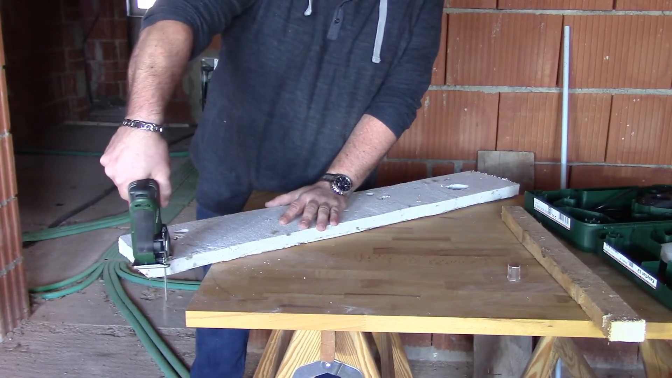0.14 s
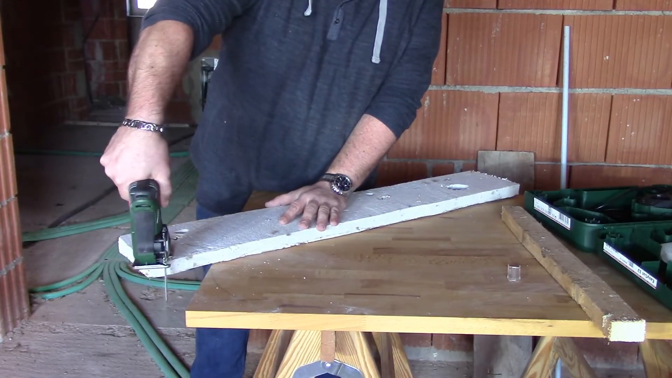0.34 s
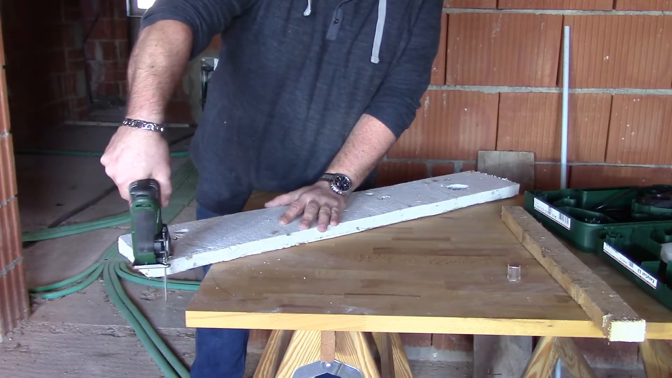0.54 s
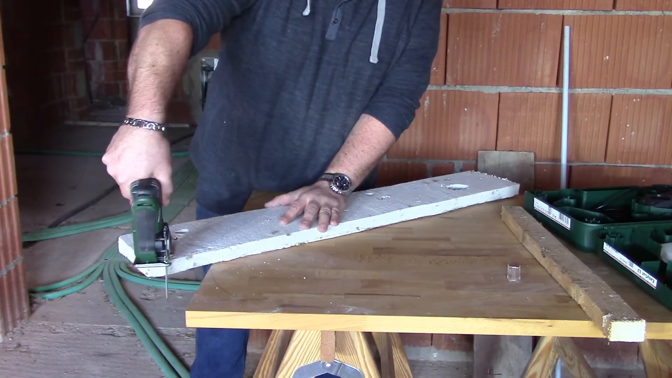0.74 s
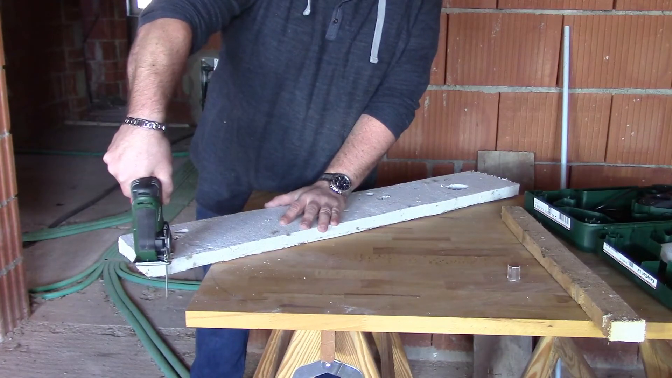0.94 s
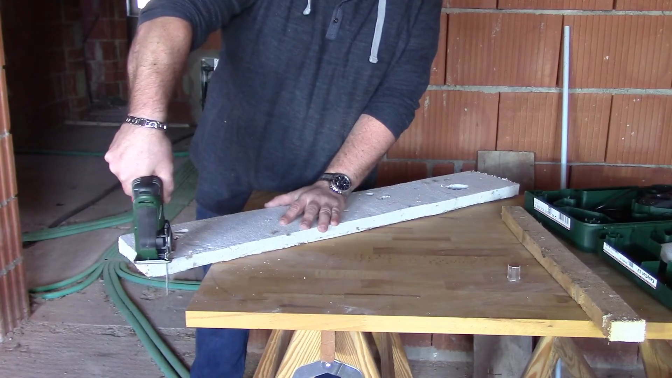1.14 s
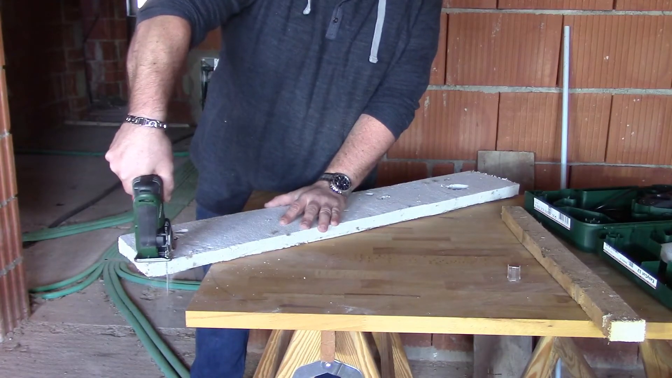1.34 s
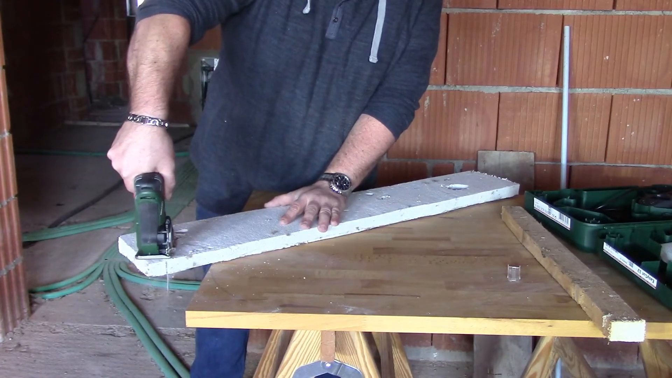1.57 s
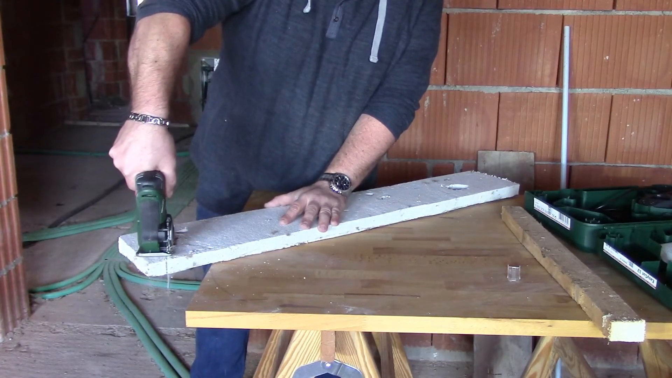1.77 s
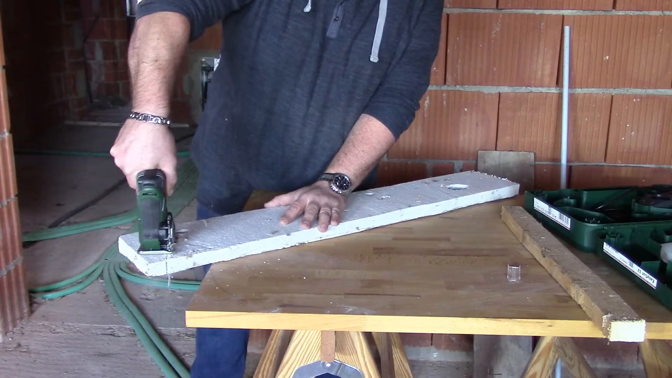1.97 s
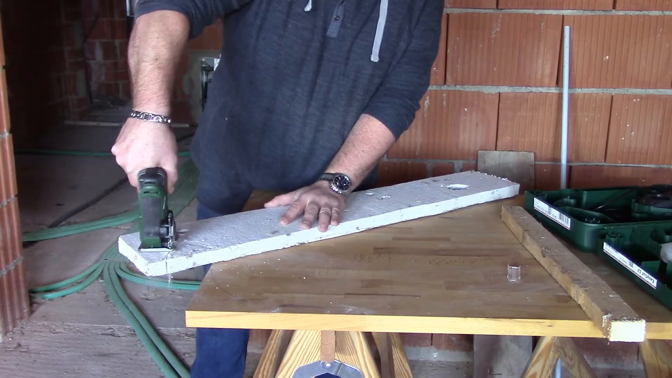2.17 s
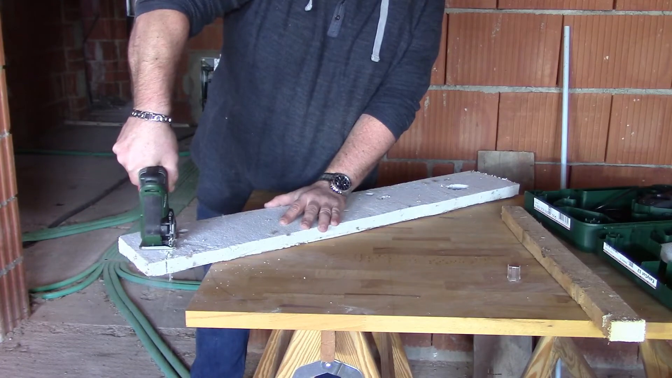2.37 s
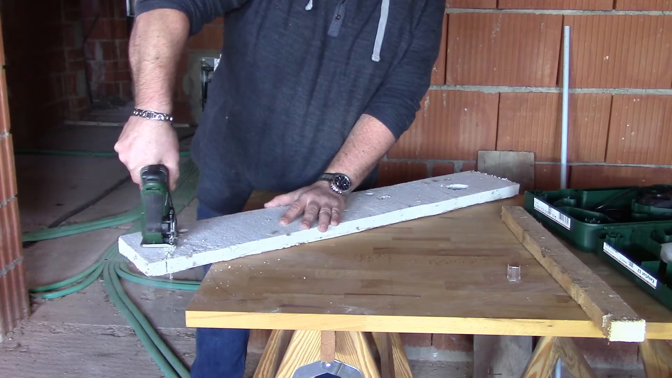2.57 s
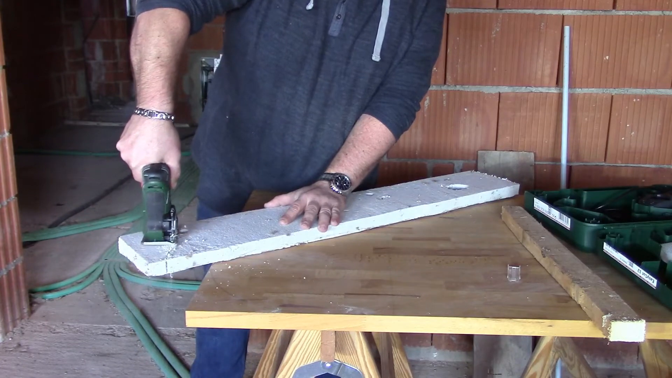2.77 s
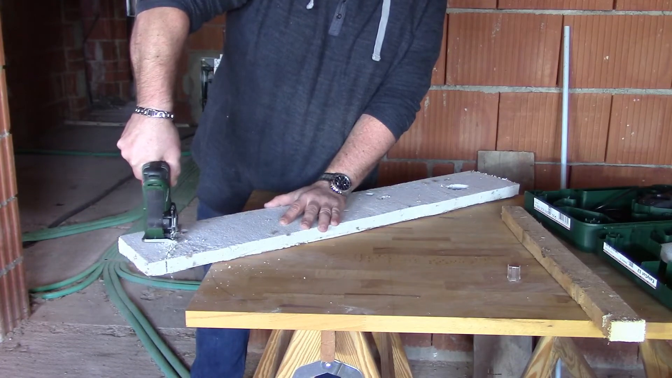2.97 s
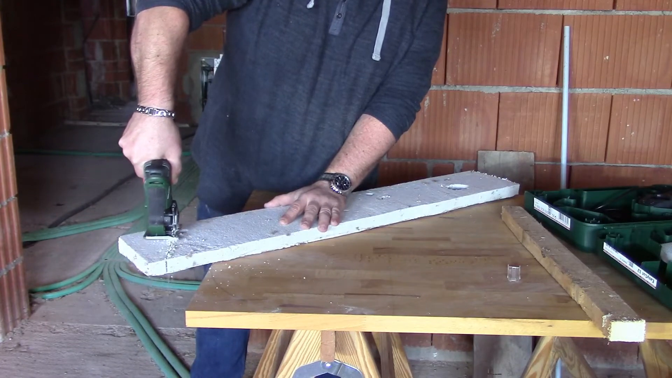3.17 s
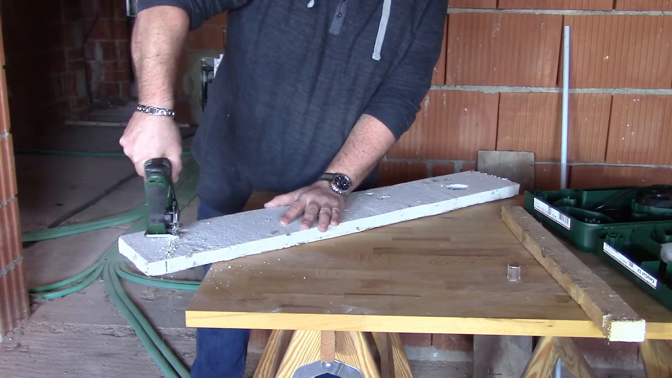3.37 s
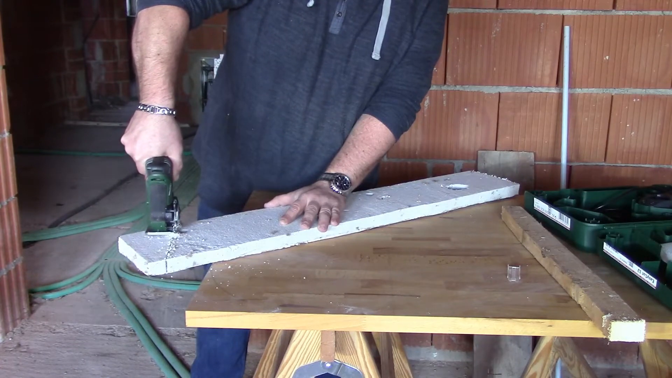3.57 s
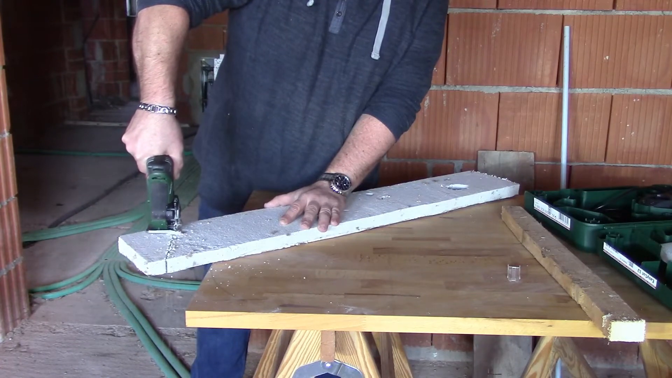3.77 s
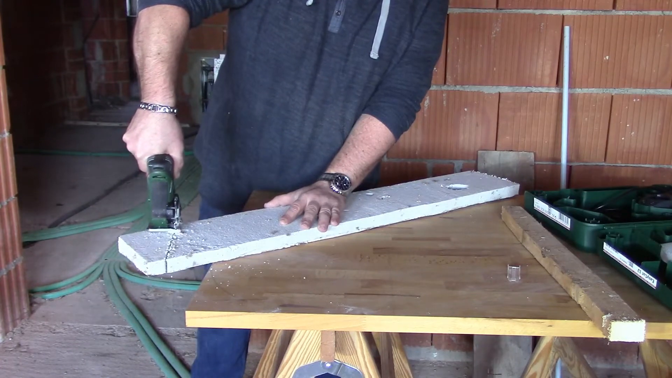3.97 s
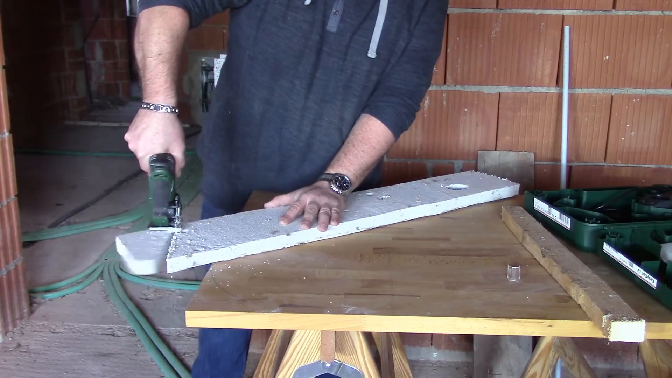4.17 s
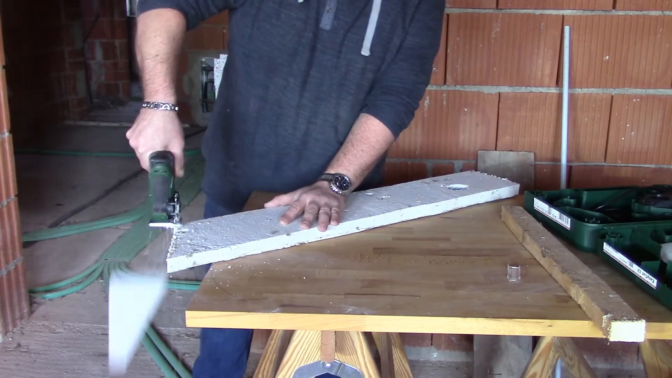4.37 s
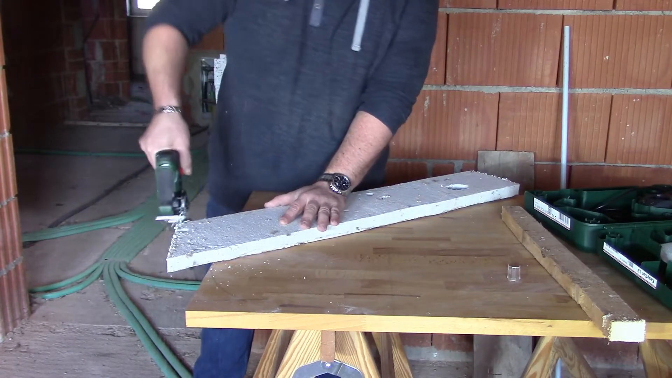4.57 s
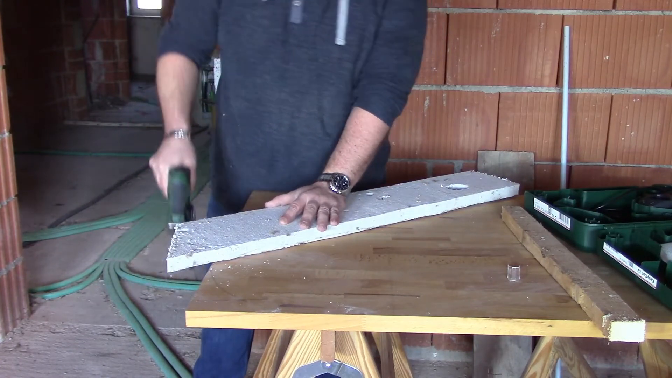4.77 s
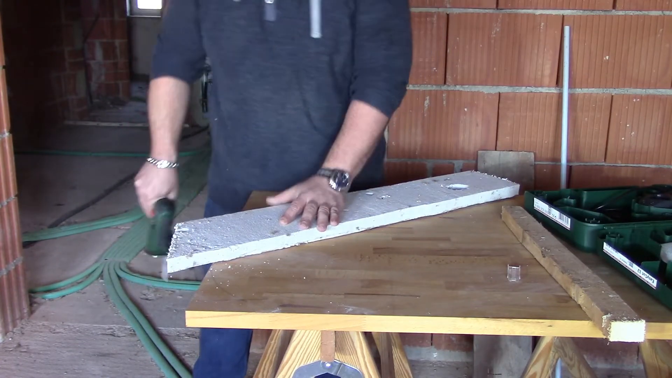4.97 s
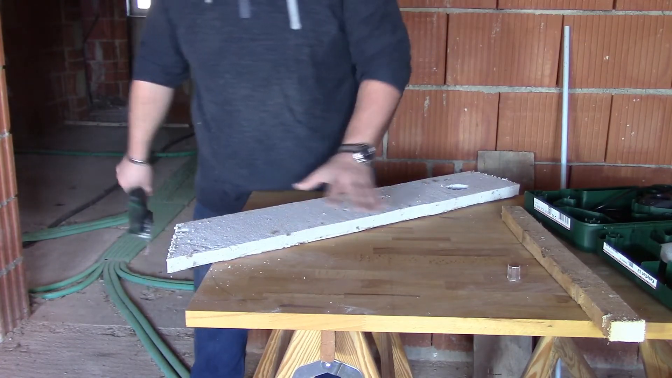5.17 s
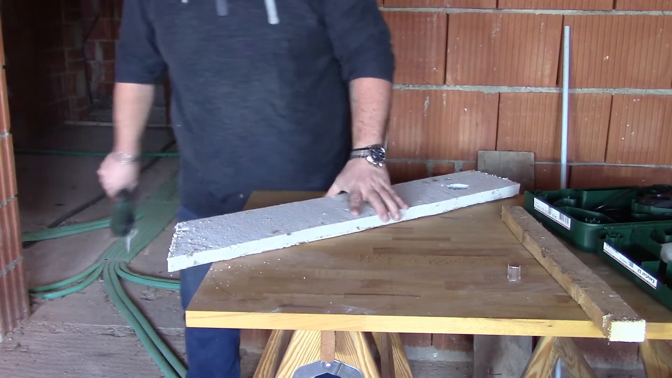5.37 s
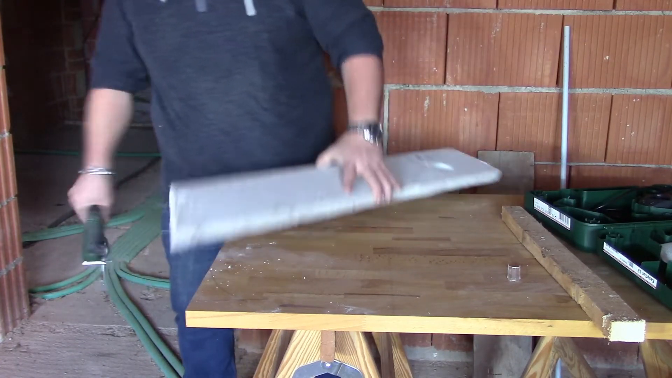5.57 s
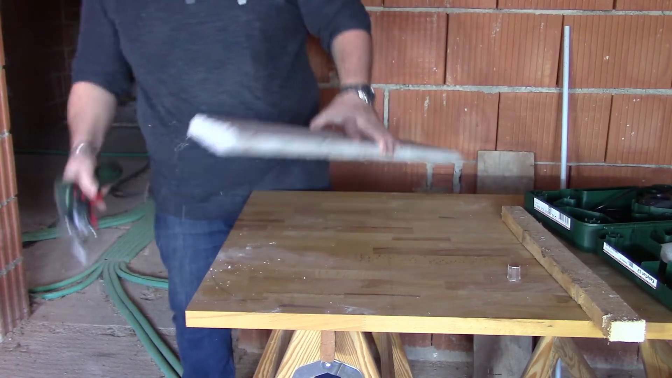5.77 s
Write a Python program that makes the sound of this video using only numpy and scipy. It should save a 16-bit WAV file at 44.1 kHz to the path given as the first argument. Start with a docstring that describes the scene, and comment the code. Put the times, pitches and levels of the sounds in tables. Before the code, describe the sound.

A small cordless saw cuts through a foam board on a workbench, its high motor whine mixed with a loud rattling rasp and a wavering howl. After about four seconds the foam snaps and the saw winds down. The offcut hits the floor with a short ringing clatter. Light scrapes, dull bumps and a few plastic clicks follow. The sound is fairly close, with a short brick room echo.

```python
"""Sawing foam board in a brick room.

A small cordless chain saw cuts through a foam board on a workbench. The motor whines at multiples of
its shaft speed, the chain rattles, and the teeth drive the bar into a howl, highest half way through.
The offcut snaps free and clatters to the floor, ringing in its own modes. The board scrapes off the
bench and the plastic tool clicks in the hand, while the brick walls reflect the sound."""
import sys
import numpy as np
from scipy import signal
from scipy.fft import rfft, irfft
from scipy.io import wavfile
from scipy.ndimage import uniform_filter1d

SR = 44100
rng = np.random.default_rng(int(sys.argv[2]) if len(sys.argv) > 2 else 0)


def dump_mix(stems):
    """Bounce the given channels to the path in sys.argv[1] as a 16-bit WAV at rate SR."""
    frames = np.atleast_2d(stems).T  # one column per channel
    limited = np.clip(frames, -1, 1)  # hard clip at full scale
    pcm = np.round(limited * 32767).astype(np.int16)
    wavfile.write(sys.argv[1], SR, pcm)


N = 256662
TIME = np.arange(N) / SR
FREQ = np.fft.rfftfreq(N, 1 / SR)
FREE_SPEED = 388.3  # turns per second of the unloaded shaft
THROUGH_S, RELEASE_S = 4.2, 0.033  # the cut is through and the chain runs free


def saw():
    """Amplitude modulation: links strike the foam in step with the shaft. Returns (rasp, tones)."""
    depth = arch(2.32, 0.91)  # the bar sinks into the board and comes out again
    grip = arch(1.8, .9)  # the kerf grips hardest a little before the middle of the cut
    speed = shaft_speed()
    turns = np.cumsum(speed) / SR
    bite = amp(2.5 * np.cos(2 * np.pi * turns) + 1.24 * wander(286.5) + 0.77 * wander(32.45))
    push_grind_db, push_drum_db, push_howl_db = hand_pressure()
    rattle = chain_rattle(bite, speed)
    cutting = tooth_grinding(bite, push_grind_db) + board_drumming(bite, push_drum_db)
    shake = bench_shake(speed, depth)
    howl = amp(push_howl_db) * bar_howl(bite, depth, grip)
    body = amp(3.0) * bench(cutting + shake, direct_db=-3) + amp(4.5) * bench(howl, direct_db=-7)
    running = np.interp(TIME, [4.335, 4.375], [1, 0])  # the brake stops the chain
    rasp = running * (rattle + body + chain_singing(grip))
    trigger = np.interp(TIME, [4.24, 4.33], [1, 0])  # the whine fades as the trigger is let go
    return rasp, trigger * motor_whine(speed, grip) + bar_chatter() + bar_ring()


def shaft_speed():
    """Torque against load: half trigger, full trigger, sag in the cut, then exponential braking."""
    # The shaft at half trigger, then from the squeeze on. Each row: time in seconds, turns per second.
    half_trigger = [(0, 275), (.185, 283)]
    full_trigger = [(.24, 337), (.29, 372), (.38, 385.3), (.62, 389.2), (.88, 387), (1.1, 382.8),
                    (2, 380.2), (2.2, 382.5), (2.98, 380.2), (3.05, 377), (3.2, 382.6), (3.32, 383.4),
                    (3.68, 379), (3.8, 383.6), (3.92, 384.2), (4.01, 377.5), (4.1, 382.2), (4.24, 384.5),
                    (4.3, 370.8)]
    brake_s, brake_decay_s = 4.32, .19
    driven = uniform_filter1d(curve(list(half_trigger) + list(full_trigger)), size=SR // 20)
    return driven * np.exp(-np.maximum(TIME - brake_s, 0) / brake_decay_s)


def motor_whine(speed, grip):
    """Rotational harmonics: shaft and gear orders flicker, and break up once the teeth bite."""
    # Motor partials. Each row: multiple of the shaft speed, level in dB, change at full grip in dB,
    # change while speeding up in dB, fade in dB per second.
    orders = [(1, -35, 2.5, -1, -.3), (2, -37, 2, 0, .5), (6, -42, 0, 0, 0), (8, -30.5, -5, 9, 0),
              (9, -37, 2, -4, .2), (10, -32, -2, -3, .8), (16, -31, 6, -1, 1.4), (17, -37.5, 8.5, -3, -.2),
              (18, -36.5, 5.5, -3, .6), (21, -31.5, -1, 0, 2.1), (24, -32.5, -.5, 0, 1.4),
              (26, -44, 0, 0, .8), (29, -46, 0, 0, 1)]
    # The pinion whines loudest under light load. Each row: time in seconds, level in dB.
    pinion_levels = [(.17, -36), (.24, -20), (.31, -23), (.36, -28), (.44, -24), (.65, -23), (.74, -27),
                     (.83, -24), (.95, -28), (1.05, -23), (1.3, -27.5), (1.7, -36), (1.88, -30.5),
                     (2.05, -39), (2.4, -33), (2.95, -35), (3.28, -25.5), (3.48, -32), (4.1, -29.5)]
    pinion_teeth = 12
    turns = np.cumsum(speed * (1 + .0006 * wander(45))) / SR
    flicker = .22 + .48 * ramp(1.05, .6)
    squeeze = arch(.28, .09)  # the motor pulls hardest as the trigger is squeezed
    out = amp(curve(pinion_levels)) * partial(pinion_teeth * turns, flicker)
    for order, db, grip_db, squeeze_db, fade_db_per_s in orders:
        housing_db = np.interp(order * speed, [275, 320], [-16, 0])  # a small housing radiates little bass
        level_db = db + grip_db * grip + squeeze_db * squeeze - fade_db_per_s * TIME + housing_db
        out += amp(level_db) * partial(order * turns, flicker)
    return out * (speed / FREE_SPEED) ** 4


def chain_rattle(bite, speed):
    """Impact noise: dense link strikes build as the chain takes up and fade as the saw is drawn back."""
    # Spectrum of the links. Each row: frequency in Hz, relative level in dB.
    spectrum = [(200, -54), (1800, -31.5), (2900, -3), (3600, -5), (4300, 2), (5400, -2), (7000, -1),
                (9000, -5.5), (9500, -7), (11000, -8.5), (11900, -18), (13500, -19), (16000, -28)]
    take_up_s, recede_db_per_s = 0.076, 0.85
    slack = 1 - ramp(0, take_up_s)
    level_db = -14.5 - 5.5 * slack - recede_db_per_s * TIME - 3 * ramp(THROUGH_S, RELEASE_S)
    return amp(level_db) * speed / FREE_SPEED * unit(colour(bite * grains(9000, 2.0), spectrum))


def tooth_grinding(bite, push_db):
    """Fracture noise: the teeth break the foam in tiny bursts, weaker once the chain runs free."""
    # Spectrum of the grinding. Each row: frequency in Hz, relative level in dB.
    spectrum = [(150, -34), (500, -27), (900, -4.5), (1300, 2.5), (1580, -4), (1850, 0.5), (2170, 3.5),
                (2500, -0.5), (3000, -2), (4500, -37), (9000, -71)]
    level_db = -16.5 - 4.5 * ramp(THROUGH_S, RELEASE_S) + push_db
    return amp(level_db) * unit(colour(bite * grains(5000, 4.0), spectrum))


def board_drumming(bite, push_db):
    """Forced plate vibration: the board drums more as the bar enters, and drops once it is through."""
    # Spectrum of the board. Each row: frequency in Hz, relative level in dB.
    spectrum = [(30, -43), (90, -46), (130, -22), (165, -25), (250, -9), (340, 0), (400, 1.5), (500, 0.5),
                (650, -5), (1000, -19), (3000, -75.5)]
    entered = ramp(0, 1.46)
    level_db = -24 - 20 * (1 - entered) - 12 * ramp(THROUGH_S, RELEASE_S) + push_db
    return amp(level_db) * unit(colour(bite * grains(3000, 4.4), spectrum))


def bar_howl(bite, depth, grip):
    """Bending resonance: the teeth shake the bar, whose pitch rises with depth and creeps up the cut."""
    rest_hz, depth_hz, creep_hz_per_s = 657, 230, 16.4
    kerf_opens_s, fade_db_per_s = 2.38, 4
    hz = rest_hz + depth_hz * depth + creep_hz_per_s * TIME
    teeth = bite * grains(4000, 2.2)
    ring = resonate(resonate(teeth, hz, 163), hz, 500)
    radiation = signal.butter(3, 380, "high", fs=SR, output="sos")  # so small a blade radiates no bass
    level_db = -19 + 2 * grip - fade_db_per_s * np.maximum(TIME - kerf_opens_s, 0)
    return amp(level_db) * unit(signal.sosfilt(radiation, ring))


def bar_chatter():
    """Self-excited vibration: short, overlapping howling tones swell and fade at several pitches."""
    # Spells of chatter. Each row: start in seconds, length in seconds, pitch in Hz, level in dB.
    spells = [(0, .2, 602, -25), (.1, .16, 665, -23), (.15, .09, 900, -26), (.16, .12, 462, -31),
              (.42, .42, 464, -26), (.3, .32, 672, -26), (.5, .16, 596, -27), (.68, .18, 960, -26),
              (.7, .72, 691, -25), (1.27, .14, 800, -25), (1.79, .12, 898, -15.5), (1.82, .15, 692, -26),
              (1.918, .052, 897, -8), (1.93, .33, 764, -28), (2.03, .29, 895, -22), (2.07, .27, 964, -24),
              (2.08, .18, 1074, -27), (2.33, .2, 1064, -24), (2.36, .52, 894, -22), (2.42, .16, 962, -21),
              (2.62, .19, 964, -22.5), (2.86, .12, 1010, -24.5), (2.97, .17, 965, -23), (3, .1, 895, -25),
              (3, .13, 462, -28), (3.04, .12, 812, -26), (3.28, .14, 755, -24), (3.92, .1, 810, -26),
              (3.98, .19, 460, -31)]
    return stick_slip(spells)


def bar_ring():
    """Damping: the chain keeps the bare steel bar ringing until it sinks into the foam."""
    # Modes of the bare bar. Each row: frequency in Hz, level in dB.
    modes = [(1238, -36), (2065, -28.5), (2205, -26), (2280, -27)]
    fade_db_per_s = 14
    return amp(-fade_db_per_s * TIME) * sum(amp(db) * partial(hz * TIME, flicker=.7) for hz, db in modes)


def chain_singing(grip):
    """Narrow resonance: the chain sings high where the kerf grips it."""
    sing_hz = 6440
    ring = resonate(resonate(grains(4000, 2), sing_hz, 150), sing_hz, 240)
    return amp(-38 + 8 * grip) * unit(ring)


def hand_pressure():
    """Contact force: leaning on the saw shifts grinding, drumming and howl. Returns three dB curves."""
    # Pushes of the hand. Each row: centre in seconds, half length in seconds, then the changes of
    # grinding, drumming and howl in dB.
    pushes = [(.03, .1, 2, 0, 0), (.2, .06, 3, 13, 0), (.84, .3, 2.7, 6, 0), (2.35, .4, -1, 0, -4),
              (3.02, .12, 1.5, 3.5, 3), (3.36, .043, 1.5, 2.5, 0), (3.79, .048, 1, .5, 0),
              (4.12, .14, .5, 1.5, -4)]
    return sum(np.outer(change_db, arch(s, half_length)) for s, half_length, *change_db in pushes)


def bench_shake(speed, dip):
    """Structure-borne sound: the saw shakes the bench; the low rumble dips midway through the cut."""
    # Spectrum of the shaking. Each row: frequency in Hz, relative level in dB.
    spectrum = [(30, -23), (95, -17), (130, 7.5), (165, 3), (300, -8), (800, -42)]
    fade_db_per_s = 2.2
    level_db = -50.5 - fade_db_per_s * TIME - 10 * dip
    return amp(level_db) * (speed / FREE_SPEED) ** 2 * unit(colour(rng.standard_normal(N), spectrum))


def bench(x, direct_db):
    """Parallel resonances: the bench and its corner favour narrow pitches; a direct part passes by."""
    # Modes of bench and corner. Each row: frequency in Hz, width in Hz, relative gain in dB.
    modes = [(132, 10, 1), (198, 10, -2), (383, 12, -3), (464, 16, -1), (515, 12, -6), (598, 14, -2),
             (690, 14, 0), (764, 12, -2), (800, 14, -3), (893, 16, 2), (962, 18, 0), (1006, 12, -5),
             (1067, 16, 0), (1237, 16, -4), (1359, 18, -4)]
    response = sum(amp(db) / (1 + 2j * (FREQ - hz) / width) for hz, width, db in modes)
    return amp(-4) * irfft(rfft(x) * (amp(direct_db) + amp(2) * response), N)


def foam_snaps():
    """Brittle fracture: the last strip of foam snaps, then the chain catches."""
    # The two snaps. Each row: start in seconds, level in dB, decay in seconds.
    snaps = [(4.19, -10, 0.007), (4.32, -8, 0.0025)]
    # Their spectrum. Each row: frequency in Hz, relative level in dB.
    spectrum = [(60, -39), (200, -23), (310, 6), (450, -4), (800, -9), (2000, 9.5), (5000, 0), (16000, -37)]
    return transients(snaps, spectrum)


def board_knock():
    """Elastic rebound: the freed board knocks against the bench, cushioned by the soft foam."""
    # Modes of the knock. Each row: frequency in Hz, relative level in dB, 60 dB decay time in seconds.
    modes = [(305, 0, .1), (455, -3, .08), (520, -6, .06)]
    start_s, level_db, rise_s = 4.19, -14, .007
    out, t = np.zeros(N), np.arange(SR // 5) / SR
    ring = sum(amp(level_db + db - 60 * t / t60) * np.sin(2 * np.pi * hz * t) for hz, db, t60 in modes)
    add(out, start_s, ring * (1 - np.exp(-(t / rise_s) ** 2)))
    return out


def offcut_clatter():
    """Modal ringing: each landing excites the same modes; a soft contact leaves out the high ones."""
    # Offcut modes. Each row: frequency in Hz, relative level in dB, 60 dB decay time in seconds.
    modes = [(474, -17, .3), (694, -3, .16), (1066, -14, .35), (1192, -10, .34), (1281, -14, .2),
             (1389, -14, .18), (1604, -2.5, .26), (1755, -6, .16), (1835, -3, .15), (2045, -1.5, .19),
             (2126, -8, .17), (2280, -4, .24), (2460, -19, .15), (2685, -12, .22), (3160, -8, .12),
             (3420, -13, .1)]
    # Bounces. Each row: start in seconds, ring level in dB, crack level in dB, contact cutoff in Hz.
    landings = [(4.6285, -2.5, -9, 650), (4.649, -13, 3.5, 3520), (4.68, -17.5, 0.5, 3160),
                (4.695, -25, -1.5, 3500), (4.745, -40, -18, 2500), (4.797, -41, -31, 3000),
                (4.853, -52, -38, 3000), (4.916, -34, -28, 1500)]
    # Spectrum of the crack of contact. Each row: frequency in Hz, relative level in dB.
    crack_spectrum = [(40, -63), (150, -42), (300, -12), (700, -3.5), (1300, 2), (2000, 9.5), (2700, -7),
                      (3400, -8), (4500, -16), (8000, -28), (16000, -25)]
    out, t = np.zeros(N), np.arange(SR * 3 // 4) / SR
    hz, db, t60 = np.transpose(modes)[:, :, None]
    ringing = amp(db - 60 * t / t60) * np.sin(2 * np.pi * hz * t)
    attack = 1 - np.exp(-t / 0.0011)
    for s, ring_db, crack_db, cutoff_hz in landings:
        ring = (ringing / np.sqrt(1 + (hz / cutoff_hz) ** 4)).sum(0)
        crack = colour(rng.standard_normal(len(t)) * np.exp(-t / 0.0039), crack_spectrum)
        crack = signal.lfilter(*signal.butter(1, cutoff_hz, fs=SR), crack)
        add(out, s, amp(ring_db) * ring * attack + amp(crack_db - 3.0) * crack)
    return out


def air_puff():
    """Air displacement: the offcut's first, flat landing squeezes out a short dull thud."""
    # Spectrum of the puff. Each row: frequency in Hz, relative level in dB.
    spectrum = [(60, -50), (140, -23), (230, -3), (330, -1), (550, -1), (1000, -39), (4000, -62)]
    start_s, level_db, decay_s = 4.6285, -7.5, 0.007
    return transients([(start_s, level_db, decay_s)], spectrum)


def foam_squeaks():
    """Stick-slip friction: the foam squeaks as it skids."""
    # Skids. Each row: start in seconds, length in seconds, pitch in Hz, level in dB.
    skids = [(4.636, .014, 700, -9.5), (4.677, .014, 698, -13), (4.822, .024, 692, -18.5),
             (4.872, .05, 694, -34)]
    return stick_slip(skids)


def board_scrape():
    """Sliding friction: foam rasps over wood in clumps of grains; each stroke swells and dies away."""
    # Strokes of the board. Each row: start, rise and decay in seconds, level in dB.
    strokes = [(4.72, 0.21, 0.098, -45), (5.224, 0.057, 0.0067, -30.5), (5.35, 0.056, 0.027, -34),
               (5.45, 0.13, .3, -60)]
    # Spectrum of foam on wood. Each row: frequency in Hz, relative level in dB.
    spectrum = [(88, -63), (150, -6), (321, -4), (398, 1.5), (484, -1), (566, -9), (854, -1), (1290, -9),
                (1660, -3), (2400, -5), (3220, -10), (9630, -16), (16000, -32)]
    sliding = sum(amp(db) * ramp(s, rise) ** 2 * np.exp(-np.maximum(TIME - s - rise, 0) / decay)
                  for s, rise, decay, db in strokes)
    return sliding * amp(1.3 * wander(90)) * unit(colour(grains(2500, 1.9), spectrum))


def sharp_ticks():
    """Brief contacts have broad spectra: sharp ticks as the offcut lands and the board scrapes."""
    # Ticks. Each row: start in seconds, level in dB, decay in seconds.
    ticks = [(4.576, -41, 0.013), (4.629, -12, 0.0062), (4.649, -11.5, 0.0013), (4.742, -25.5, .002),
             (4.7946, -33, 0.0056), (4.837, -28, 0.0018), (4.8525, -29.5, 0.0046), (4.8914, -38, 0.0018),
             (4.9163, -26, 0.0041), (5.0011, -49, .003), (5.1553, -44, 0.0036), (5.1997, -43, .002),
             (5.2411, -30.5, 0.014), (5.4122, -16.5, 0.0063)]
    # Their spectrum. Each row: frequency in Hz, relative level in dB.
    spectrum = [(100, -25), (600, -7.5), (1500, 3), (2900, 0), (3500, -6), (4200, -0.5), (6000, -4),
                (8500, -5), (11000, -8.5), (16000, -29)]
    return transients(ticks, spectrum)


def tool_clicks():
    """Damped impacts: the plastic tool clicks in the hand."""
    # Clicks. Each row: start in seconds, level in dB, decay in seconds.
    clicks = [(5.6113, -23.5, 0.0033), (5.619, -32.5, 0.0088), (5.684, -33, .002), (5.7415, -22, 0.0027)]
    # Their spectrum. Each row: frequency in Hz, relative level in dB.
    spectrum = [(100, -34), (700, -9.5), (1500, -2.5), (2300, 0), (2900, 2), (3500, 0), (4200, 2.5),
                (6000, -2.5), (8500, -7), (10500, -23), (16000, -32)]
    return transients(clicks, spectrum)


def bench_bumps():
    """Free vibration: dull bumps ring the bench's lowest modes."""
    # Bumps. Each row: start in seconds, level in dB.
    bumps = [(4.19, -49), (4.632, -44), (5.012, -30), (5.281, -31.5)]
    rise_s, t60_s = 0.018, 0.29
    out, t = np.zeros(N), np.arange(SR // 2) / SR
    ring = sum(gain * np.sin(2 * np.pi * hz * t) for hz, gain in [(131, 1), (255, 0.33), (105, 0.13)])
    for s, db in bumps:
        add(out, s, amp(db - 60 * t / t60_s) * (1 - np.exp(-t / rise_s)) * ring)
    return out


def room(x, size=16384):
    """Time-varying reverberation: as tool and body move, each stretch of sound gets its own tail."""
    already_ringing = np.pad(x, (size, 0), mode="reflect")  # the saw is running as the scene opens
    padded, out = np.pad(already_ringing, (0, size)), np.zeros(N + 2 * size)
    window = signal.windows.cosine(size)
    for start in range(0, N + size, size // 2):
        add(out, start / SR, signal.fftconvolve(padded[start:start + size] * window, room_tail()))
    return out[size:size + N]


def room_tail():
    """Frequency-dependent absorption: sparse reflections off brick die at their own rate in each band."""
    # Decay of the room. Each row: frequency in Hz, reverberation time in seconds.
    decay_times = [(120, 0.28), (400, 0.71), (1100, 0.63), (2200, 0.5), (4000, 0.39), (9000, 0.26),
                   (16000, 0.27)]
    count, first_reflection_s = 2000, .006
    taps = np.zeros(SR)
    signs = rng.choice([-1., 1.], count)
    arrivals = (np.arange(count) + rng.random(count)) * (SR - 1) / count
    taps[arrivals.astype(int)] = signs
    taps[:int(first_reflection_s * SR)] = 0
    hz, t, bands = signal.stft(taps, SR, nperseg=256)
    tail = signal.istft(bands * amp(-60 * t / read(decay_times, hz)[:, None]), SR, nperseg=256)[1]
    return tail / np.linalg.norm(tail)


def background():
    """Stationary noise: a faint, low hush fills the room."""
    # Spectrum of the hush. Each row: frequency in Hz, relative level in dB.
    spectrum = [(25, -27), (100, 0), (400, 1.5), (1500, -7), (5000, -22), (15000, -51.5)]
    return amp(-57) * colour(rng.standard_normal(N), spectrum)


def stick_slip(rows):
    """Stick-slip oscillation: short swelling tones with an unsteady pitch."""
    out = np.zeros(N)
    for s, length, hz, db in rows:
        count = int(length * SR)
        turns = np.cumsum(hz * (1 + .005 * wander(60)[:count])) / SR
        swell = amp(db + 2 * wander(25)[:count]) * signal.windows.tukey(count, .5)
        add(out, s, swell * np.sin(2 * np.pi * turns))
    return out


def transients(rows, spectrum):
    """Impulsive excitation: exponentially decaying noise bursts share one spectrum."""
    out, t = np.zeros(N), np.arange(SR // 10) / SR
    for s, db, decay in rows:
        add(out, s, amp(db - 3.0) * rng.standard_normal(len(t)) * np.exp(-t / decay))
    return colour(out, spectrum)


def grains(per_s, spread_db):
    """Shot noise: tiny fractures and impacts of uneven size at random times."""
    size = amp(spread_db * np.minimum(rng.exponential(1, N), 4))
    return unit(size * rng.choice([-1, 1], N) * (rng.random(N) < per_s / SR))


def partial(turns, flicker, rate_hz=15):
    """Random modulation: a tone of rms 1 whose strength and phase flicker."""
    unsteady = 1 + flicker * (wander(rate_hz) + 1j * wander(rate_hz)) / np.sqrt(2)
    carrier = np.exp(2j * np.pi * (turns + rng.random()))
    return np.sqrt(2 / (1 + flicker ** 2)) * (unsteady * carrier).real


def resonate(x, hz, width_hz):
    """A damped resonator of gain 1 whose frequency can follow a curve."""
    phasor = np.exp(2j * np.pi * np.cumsum(hz * np.ones(N)) / SR)
    pole = np.exp(-np.pi * width_hz / SR)
    return 2 * (phasor * signal.lfilter([1 - pole], [1, -pole], x / phasor + 1e-18)).real


def colour(x, spectrum):
    """Minimum-phase filtering to a spectrum; keeps the power of white noise."""
    log_gain = np.log(amp(read(spectrum, abs(np.fft.fftfreq(4096, 1 / SR)))))
    taps = np.fft.ifft(np.exp(np.conj(signal.hilbert(log_gain)))).real
    return signal.oaconvolve(x, taps / np.linalg.norm(taps))[:len(x)]


def wander(rate_hz):
    """Random fluctuation of rms 1, mostly below the given rate."""
    knots = rng.standard_normal(N // 16)
    return unit(np.interp(TIME * 2 * rate_hz, np.arange(len(knots)), knots))


def arch(centre_s, half_length_s):
    """A Gaussian swell from 0 to 1 and back."""
    return np.exp(-((TIME - centre_s) / half_length_s) ** 2)


def ramp(start_s, length_s):
    """A linear rise from 0 to 1 that stays."""
    return np.clip((TIME - start_s) / length_s, 0, 1)


def curve(rows):
    """Interpolates rows of time and value at every sample."""
    return np.interp(TIME, *np.transpose(rows))


def read(points, hz):
    """Interpolates a table on a log-frequency axis."""
    f, value = np.transpose(points)
    return np.interp(np.log(hz + 1), np.log(f + 1), value)


def add(mix, s, sound):
    """Superposition: mixes a sound in at a time in seconds."""
    part = mix[max(round(s * SR), 0):][:len(sound)]
    part += sound[:len(part)]


def amp(db):
    """Decibels to gain."""
    return 10 ** (np.asarray(db) / 20)


def unit(x):
    """Scales to rms 1."""
    return x / np.sqrt(np.mean(x ** 2) + 1e-20)


def scene():
    """Direct and diffuse fields: all sounds near the middle; tones arrive mostly by the direct path."""
    rasp, saw_tones = saw()
    clatter = amp(-.5) * offcut_clatter()
    noises = amp(-3.5) * rasp + amp(2.0) * board_scrape()
    noises += amp(-0.5) * sharp_ticks() + tool_clicks() + amp(1.5) * foam_snaps()
    tones_and_thuds = saw_tones + foam_squeaks() + bench_bumps() + board_knock() + air_puff()
    hush = background()
    direct = noises + clatter + tones_and_thuds
    reverberation = amp(-1.5) * room(noises + amp(-5) * clatter + amp(-7.5) * tones_and_thuds)
    mid = direct + reverberation + hush
    # Stereo width. Each row: frequency in Hz, relative level in dB.
    width = [(100, -7.0), (1500, -23.5), (4500, -2.0), (8500, -4.5), (12000, 0.5)]
    side = amp(-13.5) * colour(room(direct), width)
    # The lows lean right. Each row: frequency in Hz, share moved to the left.
    balance = [(60, 0.00023), (250, -0.073), (1000, -0.071), (4000, 0.011), (8000, 0.033)]
    lean = irfft(rfft(mid) * read(balance, FREQ), N)
    return np.array([mid + side + lean, mid - side - lean])


def record(dry):
    """Soft saturation rounds the peaks at full scale; a low-pass filter then limits the band."""
    edge_hz = 15900
    limited = dry / (1 + dry ** 8) ** (1 / 8)
    low_pass = signal.firwin(511, edge_hz, window=("kaiser", 9), fs=SR)
    return signal.oaconvolve(limited, low_pass[None], "same")


dry = scene()
out = record(dry)
dump_mix(out)
```